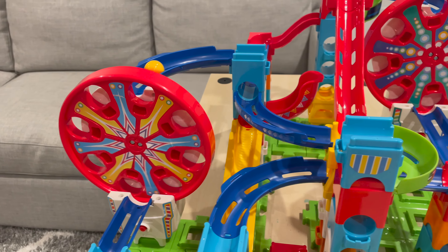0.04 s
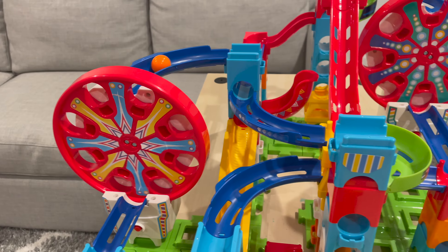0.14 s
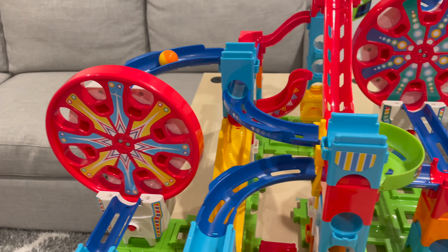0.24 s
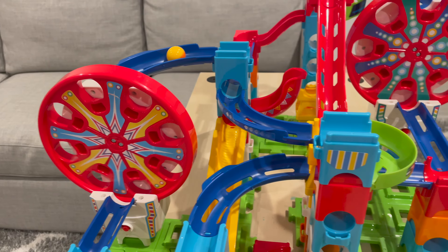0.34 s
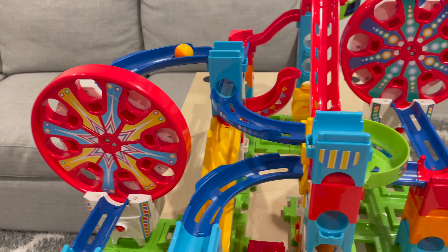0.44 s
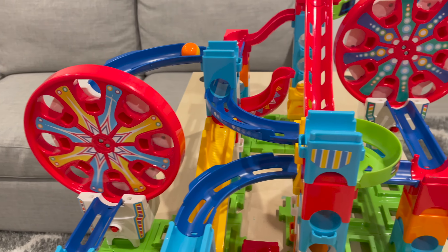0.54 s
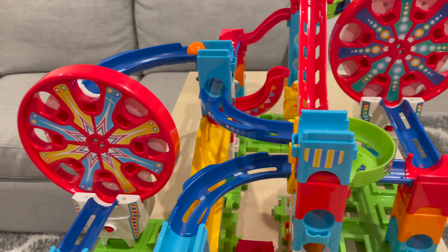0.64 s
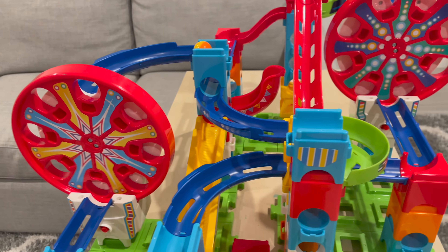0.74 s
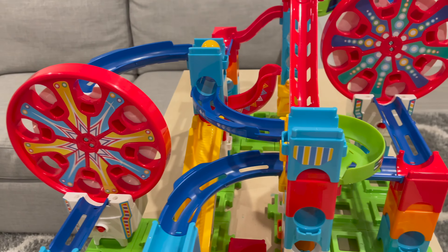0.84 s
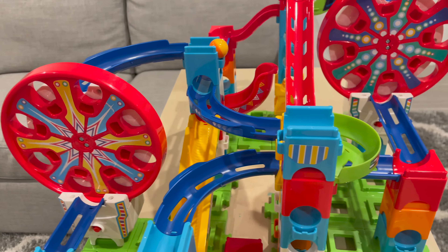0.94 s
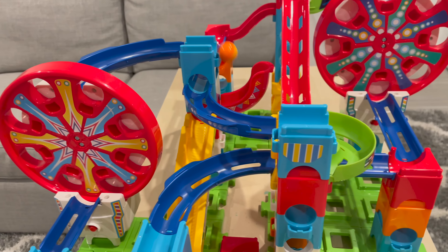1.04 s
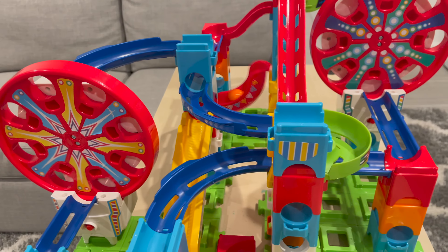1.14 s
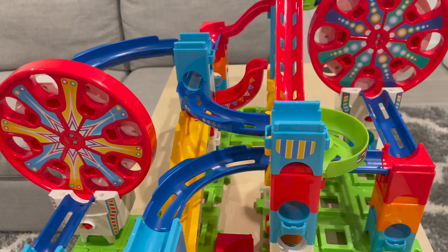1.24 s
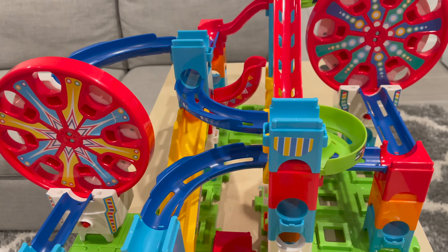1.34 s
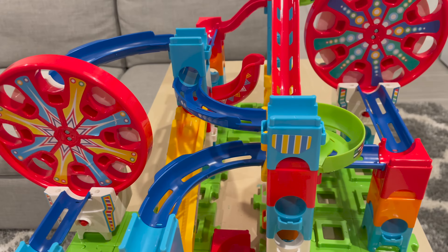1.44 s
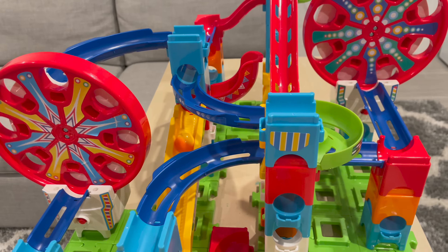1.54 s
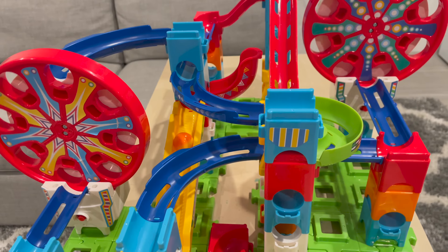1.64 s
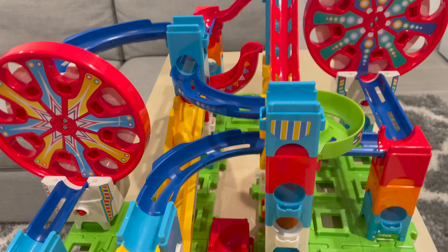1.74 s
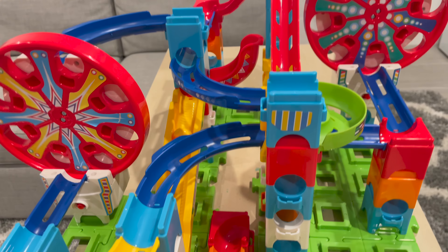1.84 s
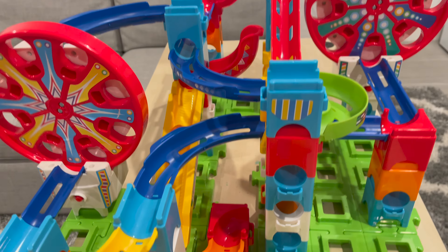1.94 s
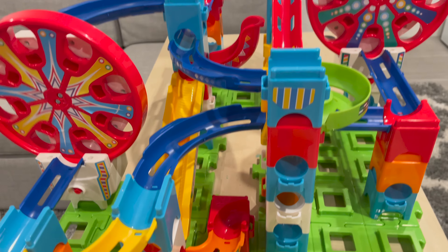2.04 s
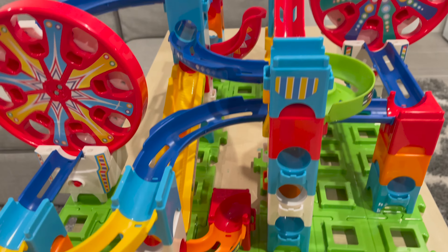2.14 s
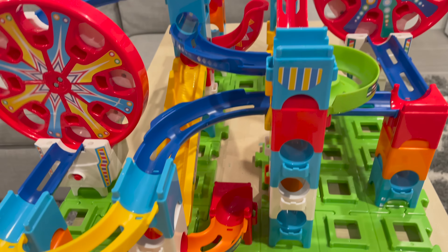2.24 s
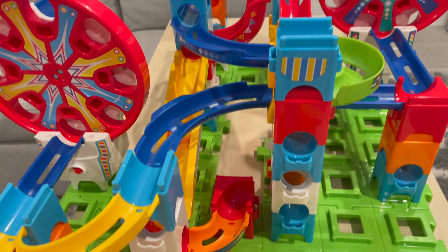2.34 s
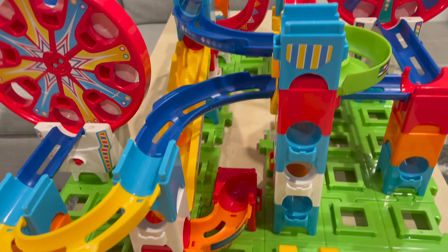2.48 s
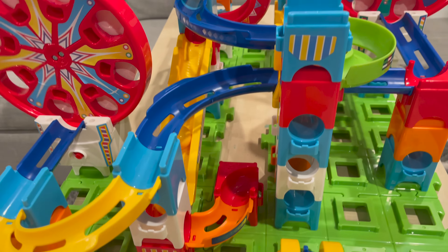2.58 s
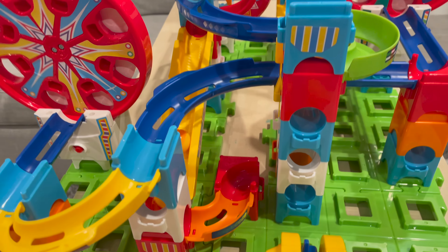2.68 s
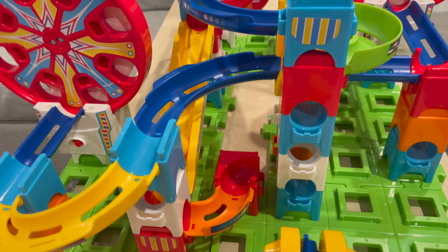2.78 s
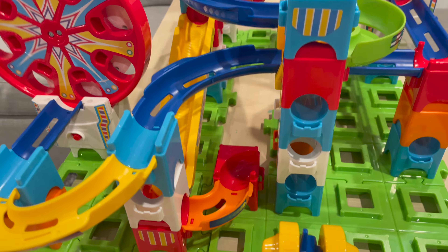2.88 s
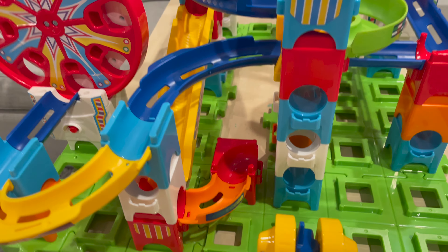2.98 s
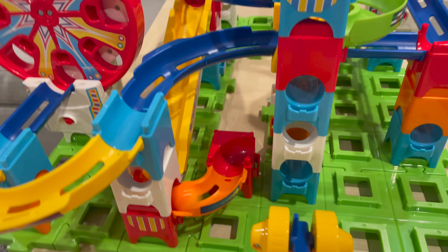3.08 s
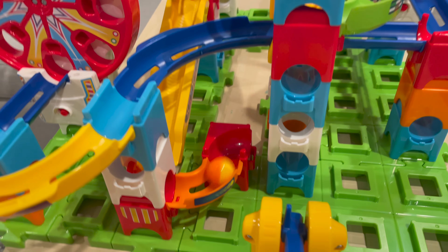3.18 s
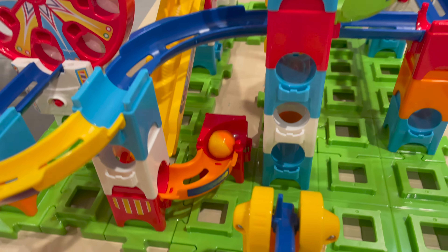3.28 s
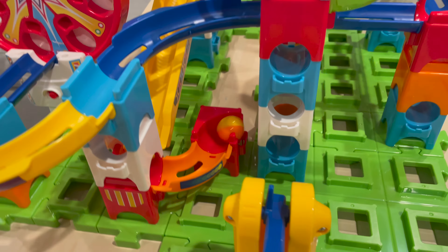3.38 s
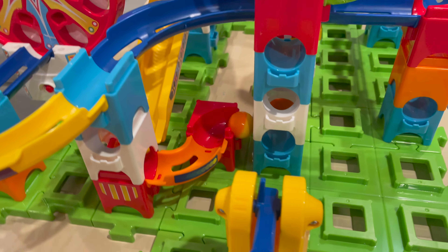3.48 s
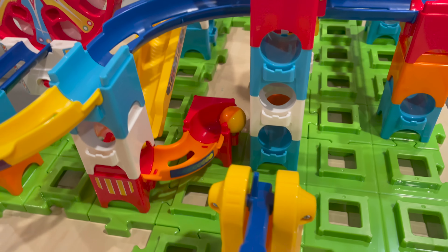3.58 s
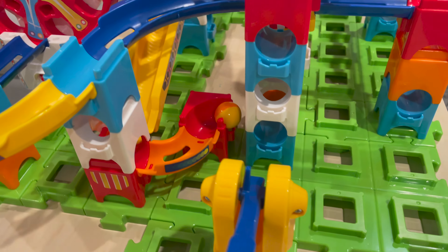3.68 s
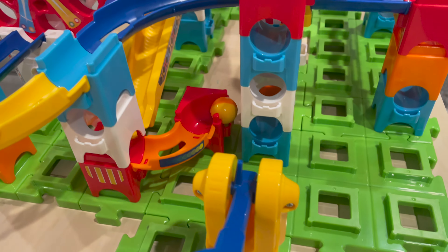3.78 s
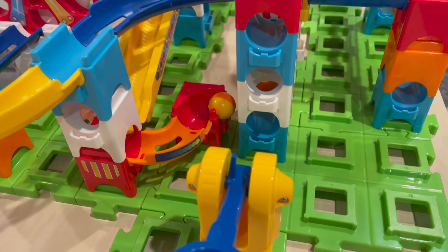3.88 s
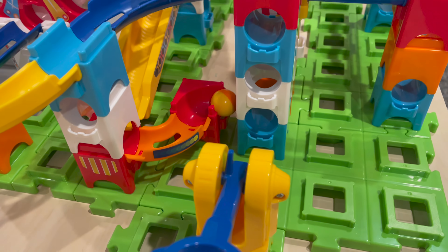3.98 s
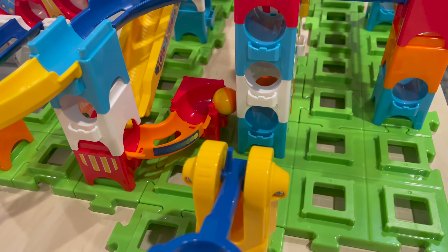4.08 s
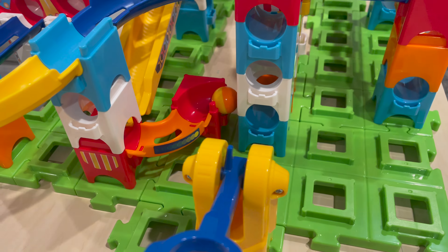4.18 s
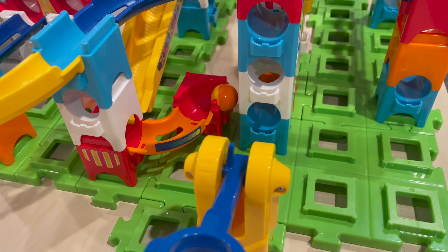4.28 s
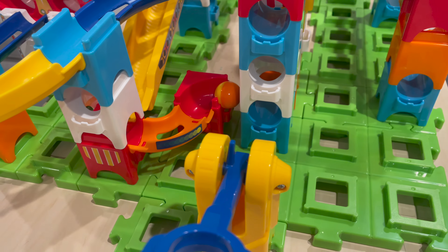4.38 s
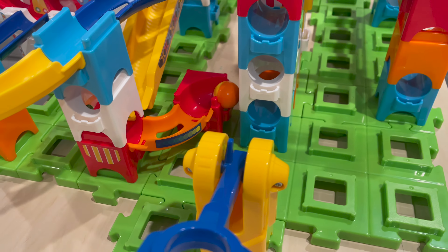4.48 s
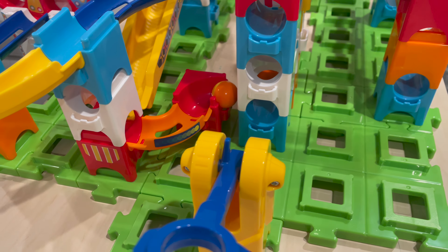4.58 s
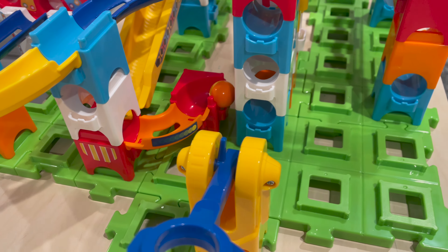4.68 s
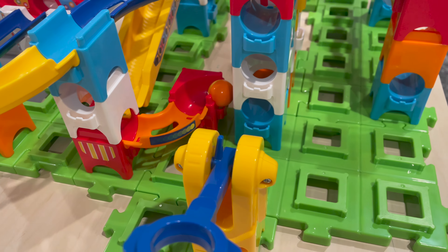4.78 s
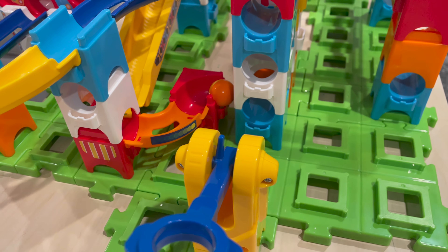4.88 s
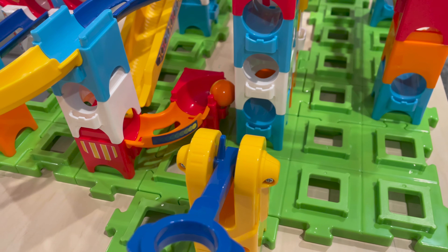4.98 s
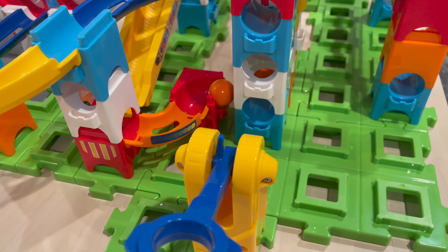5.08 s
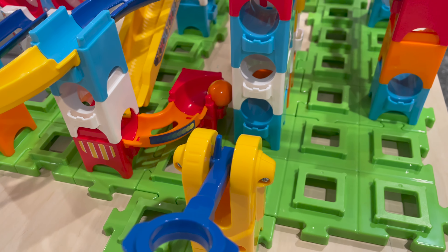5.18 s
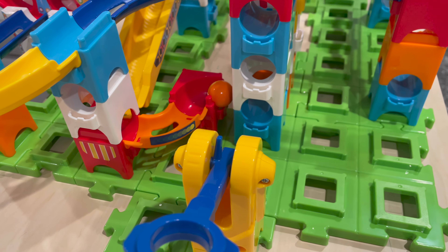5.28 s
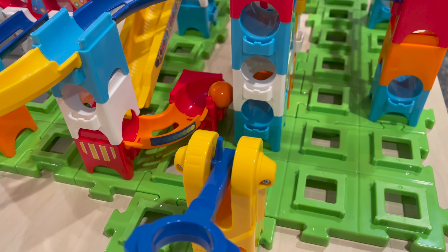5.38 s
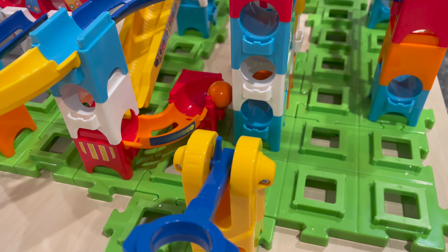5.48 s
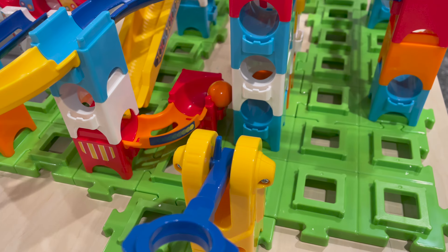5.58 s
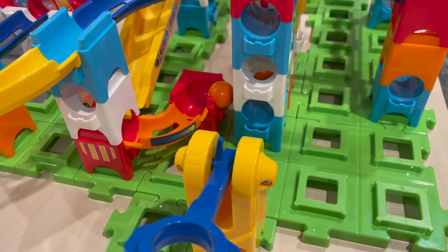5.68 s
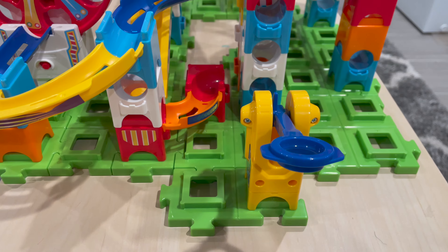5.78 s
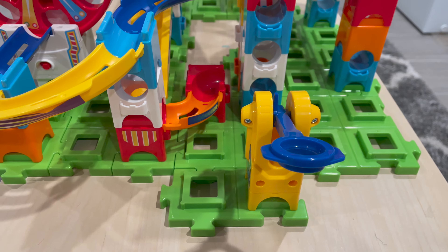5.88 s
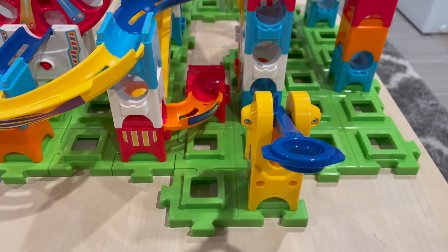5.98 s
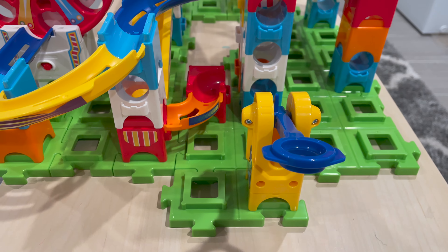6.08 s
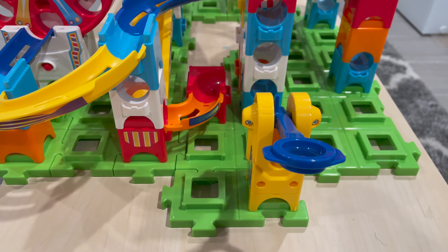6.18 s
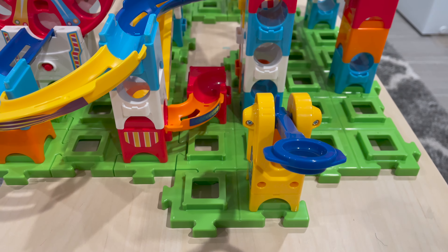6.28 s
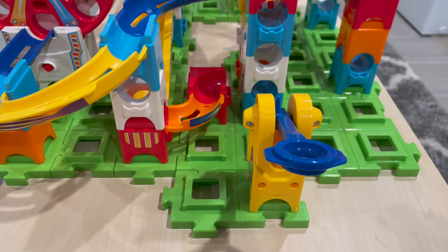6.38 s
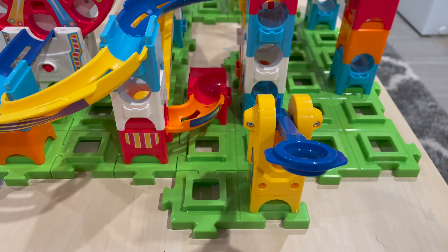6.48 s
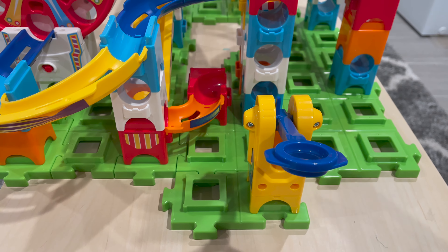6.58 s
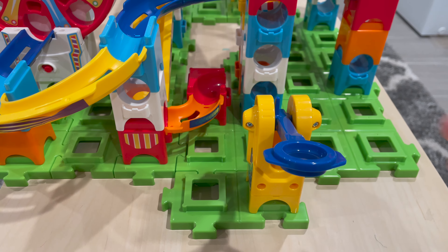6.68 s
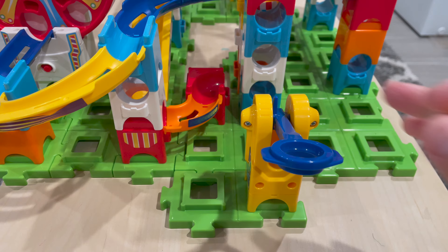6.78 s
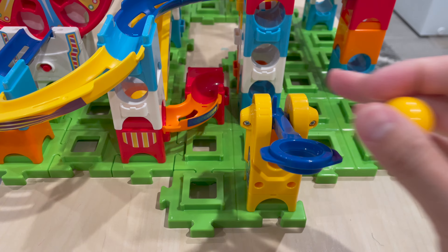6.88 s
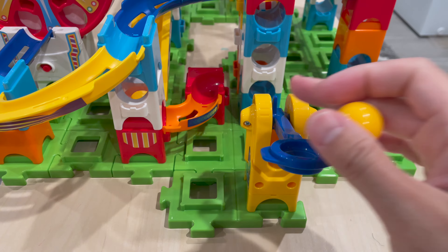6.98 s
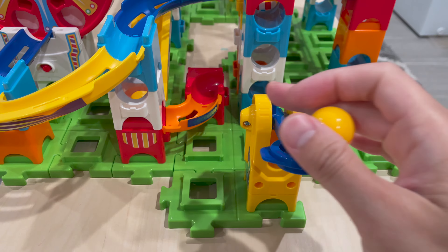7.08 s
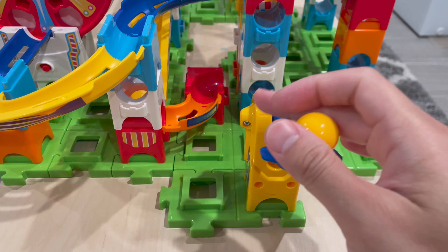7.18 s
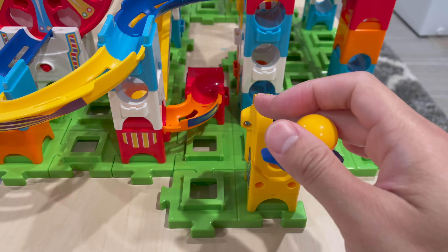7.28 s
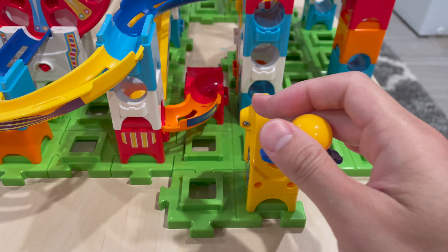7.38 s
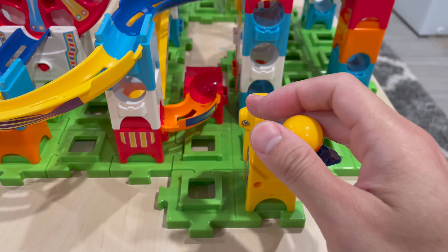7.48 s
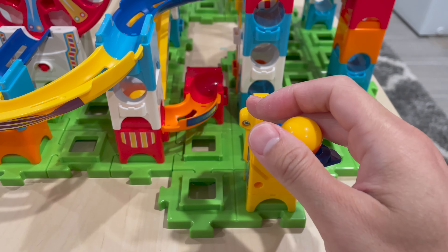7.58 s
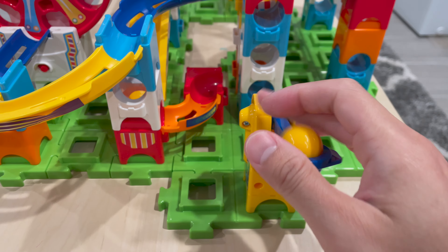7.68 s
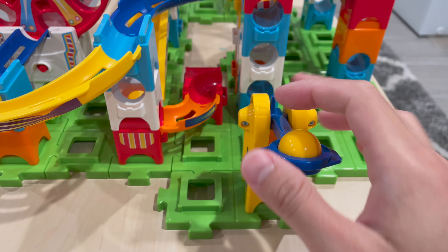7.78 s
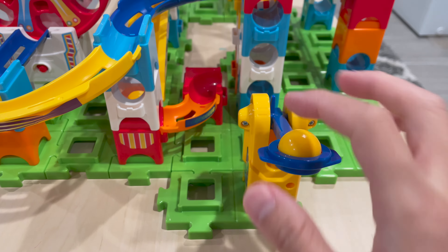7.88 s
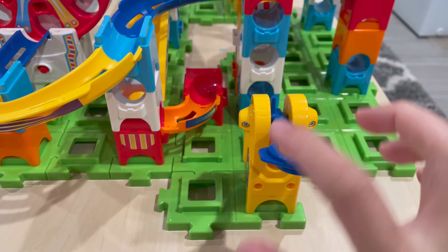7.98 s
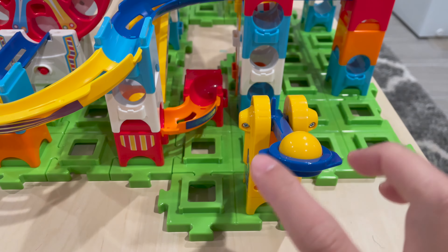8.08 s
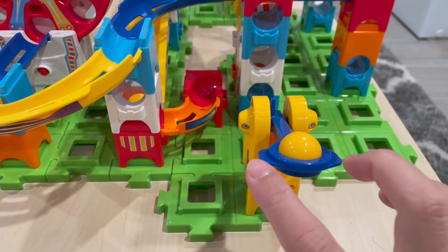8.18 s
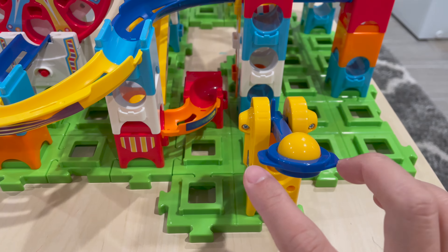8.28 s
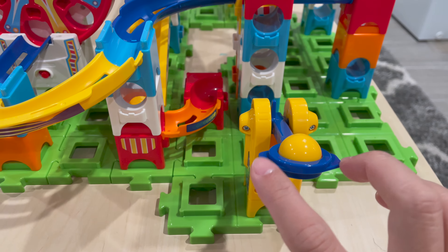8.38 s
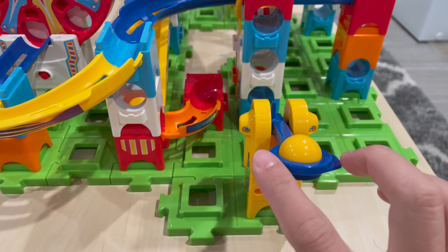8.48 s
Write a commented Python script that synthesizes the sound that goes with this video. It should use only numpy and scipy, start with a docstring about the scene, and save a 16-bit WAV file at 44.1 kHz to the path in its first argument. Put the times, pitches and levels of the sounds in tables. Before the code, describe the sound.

A small geared motor in a toy marble run hums and whirs throughout, close to the microphone, over the faint hiss of a quiet room. From the start, marbles tap lightly and roll along plastic track, with a sharper knock at about 0.7 seconds. From 1.1 to 1.5 seconds a marble drops through a hollow plastic tower and down a chute in a loud, fast clatter. After a lull, a second loud clatter comes at about 2.9 seconds, followed by rolling and more sharp knocks around 3.5 seconds. From 4 to 5.5 seconds a marble rocks and ticks softly until it settles. Near 5.8 seconds the whir changes tone slightly and continues alone, quieter. A plastic launcher clacks once at 7.2 seconds and gives a short rattling cluster of clacks around 7.7 seconds, leaving only the motor until about 8.5 seconds.

```python
"""A toy marble run on a table in a quiet room, close to a phone with two microphone ports.
A small geared motor hums and whirs throughout. Marbles tap over a bridge, then drop through a tower
(1.1 s) to a chute and ramp; impacts and rolling excite the damped modes of the hollow plastic.
A second drop (2.9 s) leads through a bend and a funnel, and a marble rocks in a corner (4-5.5 s).
The level dips briefly (5.8 s), the whir changes colour and the hiss weakens; a launcher clacks (7-8 s)."""
import sys
import numpy as np
from scipy import signal
from scipy.fft import rfft, irfft, next_fast_len
from scipy.io import wavfile
from scipy.ndimage import uniform_filter1d

SR = 44100
rng = np.random.default_rng(int(sys.argv[2]) if len(sys.argv) > 2 else 0)


def put_to_file(sound):
    """Save the sound as 16-bit audio at rate SR, in the file named by the first command-line argument."""
    columns = np.atleast_2d(sound).T  # one column per channel
    safe = np.clip(columns, -1, 1)
    whole_steps = np.round(safe * 32767)
    wavfile.write(sys.argv[1], SR, whole_steps.astype(np.int16))


N = 376173
TIME = np.arange(N) / SR
LN_1000 = np.log(1000)  # a decay of 60 dB, in nepers
DIP_S, DIP_HALF_S = 5.755, 0.012


def undb(db):
    """Level to amplitude ratio."""
    return 10 ** (np.asarray(db) / 20)


def unit(x):
    """Normalisation to rms 1."""
    return x / np.sqrt(np.mean(x ** 2))


def along(table, hz):
    """Interpolation on a logarithmic frequency axis."""
    f, values = np.transpose(table)
    return np.interp(np.log(hz + 1), np.log(f), values)


def curves(table):
    """Linear interpolation of each column in time."""
    times, *columns = np.transpose(table)
    return [np.interp(TIME, times, column) for column in columns]


def shape(x, gain):
    """Filtering as multiplication of the spectrum by gain(frequency)."""
    n = next_fast_len(x.shape[-1])
    return irfft(rfft(x, n) * gain(np.fft.rfftfreq(n, 1 / SR)), n)[..., :x.shape[-1]]


def ring(x, hz, t60):
    """Forced response of one damped mode."""
    pole = np.exp(2j * np.pi * hz / SR - LN_1000 / (t60 * SR))
    return signal.lfilter([1], [1, -pole], x).imag


def drift(rate_hz):
    """Slow random fluctuation with a standard deviation near 1."""
    steps = np.arange(int(N / SR * rate_hz) + 2) * SR / rate_hz
    return 1.2 * np.interp(np.arange(N), steps, rng.standard_normal(len(steps)))


# Interchannel phase: (frequency [Hz], left minus right [rad])
PHASE_DIFFERENCE = [(200, 0), (1300, .3), (2800, .9), (4600, .4), (5700, -1.3), (7600, -2.8), (9600, -3.5),
                    (11600, -5.7), (13000, -6.3), (17000, -6.4)]
# Interchannel level: (frequency [Hz], left minus right [dB])
LEVEL_DIFFERENCE = [(60, 3.5), (300, 3), (1500, 4), (3000, 4.5), (5000, 3.5), (9000, -0.5), (14000, 3.5)]
def stereo_image(x):
    """Interchannel level and phase differences; above about 12 kHz the sound is in phase, nearly mono."""
    half = lambda hz: undb(along(LEVEL_DIFFERENCE, hz) / 2) * np.exp(0.5j * along(PHASE_DIFFERENCE, hz))
    return np.array([shape(x[0], half), shape(x[1], lambda hz: 1 / half(hz))])


# Interchannel coherence: (frequency [Hz], shared power [fraction])
COHERENCE = [(60, 0.92), (300, 0.73), (900, 0.24), (1500, 0.099), (3000, 0.51), (6000, 0.77), (8500, 1),
             (15000, 0.98)]
def spread(make):
    """Partial coherence: left and right share part of a sound; the rest is independent in each."""
    both, left, right = make(), make(), make()
    share = lambda hz: np.clip(along(COHERENCE, hz), 0, 1)
    diffuse = shape(np.array([left, right]), lambda hz: np.sqrt(1 - share(hz)))
    return shape(both, lambda hz: np.sqrt(share(hz))) + diffuse


# Background noise: (frequency [Hz], relative spectrum level [dB])
ROOM_SPECTRUM = [(25, -34), (44, -4.5), (53, 5), (62, -2), (85, -3), (170, -10.5), (400, -10.5),
                 (900, -12.5), (1300, -21), (2800, -18.5), (5000, -19), (7000, -26), (9000, -23.5),
                 (13000, -28), (15700, -29.5), (16100, -79)]
def room(level_db=-46, hiss_from_hz=4800, late_hiss_db=-3.5):
    """Broadband noise of air, distant appliances and microphones; the hiss is weaker after the dip."""
    air = spread(lambda: unit(shape(rng.standard_normal(N), lambda hz: undb(along(ROOM_SPECTRUM, hz)))))
    hiss = shape(air, lambda hz: 1 / (1 + (hiss_from_hz / (hz + 1)) ** 4))
    hiss_db = np.where(TIME < DIP_S, 0, late_hiss_db)
    return undb(level_db + 0.5 * drift(1.55)) * (air - hiss + undb(hiss_db) * hiss)


# Motor running: (time [s], rotation rate [Hz], hum level [dB])
MOTOR_RUN = [(0, 96.26, -51), (1.8, 95.57, -49.5), (2.9, 95.85, -47), (4, 95.2, -49), (5.7, 96.66, -46.5),
             (5.78, 97.1, -48), (6.5, 96.2, -50), (7.9, 97.1, -50), (8.53, 95.6, -50.5)]
# Hum partials: (harmonic number, relative level [dB])
HUM_HARMONICS = [(1, 6.5), (2, 1), (3, -0.5), (4, 2), (5, -28), (6, -3), (7, -3.5), (8, -12), (9, 5.5),
                 (10, -53), (11, -4.5), (12, 0.5), (13, 2), (14, -8), (15, -2), (16, -17), (17, -2.5),
                 (18, -5), (19, -23), (20, -24), (21, -10), (22, -34), (23, 3), (24, 0), (25, -8)]
# Gear noise: (time [s], level [dB])
WHIR_LEVEL = [(0.0, -52), (1.02, -46.5), (1.19, -39), (1.71, -42.5), (1.99, -44.5), (2.4, -44),
              (3.06, -44.5), (3.42, -46), (3.82, -50), (4.08, -44), (4.23, -41), (5.06, -42.5), (5.56, -47),
              (5.87, -47), (7.01, -49.5), (8.03, -51), (8.53, -50)]
# Gear case: (frequency [Hz], bandwidth [Hz], relative level before the dip [dB], after it [dB])
CASE_MODES = [(1806, 180, 3.5, 5.5), (1996, 150, -17, 3), (2350, 73, -2, -5), (2980, 250, -4, 0.5),
              (3342, 110, -1.5, 4.5), (3532, 40, 1.5, 4), (3787, 59, -1, -13), (3946, 84, -8, 3.5),
              (4358, 54, -6, 1.5), (6060, 480, -8, -2)]
def motor(waver_db=3.0, throb_depth=0.38):
    """Rotation gives a harmonic series; tooth noise, modulated once a turn, drives the gear case modes."""
    turn_hz, hum_db = curves(MOTOR_RUN)
    whir_db, = curves(WHIR_LEVEL)
    angle = 2 * np.pi * np.cumsum(turn_hz) / SR

    def hum():
        return unit(sum(undb(db + waver_db * drift(5.5)) * np.sin(k * angle + 2 * np.pi * rng.random())
                        for k, db in HUM_HARMONICS))

    def whir():
        case = np.zeros(N)
        for hz, width, early_db, late_db in CASE_MODES:
            gain = undb(np.where(TIME < DIP_S, early_db, late_db) + 0.5 * drift(10))
            teeth = rng.standard_normal(N) * (1 + throb_depth * np.sin(angle))
            case += gain * unit(ring(teeth, hz, LN_1000 / (np.pi * width)))
        return unit(case)

    return undb(hum_db) * spread(hum) + undb(whir_db) * spread(whir)


def echoes(x, level_db=-14.5, t60=0.2, low_hz=148, high_hz=1480):
    """Reverberation: nearby pieces, table and walls return a duller, exponentially decaying tail."""
    t = TIME[:int(0.3 * SR)]
    tail = spread(lambda: rng.standard_normal(N))[:, :len(t)] * np.exp(-LN_1000 * t / t60) * (t > 0.002)
    tail = shape(tail, lambda hz: 1 / (1 + (hz / high_hz) ** 2) / (1 + (low_hz / (hz + 1)) ** 2))
    tail *= undb(level_db) / np.sqrt(np.sum(tail ** 2, axis=1, keepdims=True))
    return signal.fftconvolve(x, tail, axes=1)[:, :N]


# Pieces in turn: bridge, tower top, tower drop, chute, ramp, second drop, bend, skid, funnel, corner,
# launcher arm, launcher cup. Levels are relative.
# (start [s], thud frequency [Hz], shake [dB], contact time [s], mean track T60 [s], track [dB],
#  ragged push [dB], own modes in a knock [dB], own modes in a roll [dB], rattle [dB])
RUN_PIECES = [(0.0, 430, -9, 0.0023, 0.05, -6, -10, -11, -1, -31),
              (0.601, 507, -14, 0.0033, 0.04, -3, 2, -1, -3.5, -29),
              (1.1, 527, -12, 0.0022, 0.03, -4, -2.5, -4, 3.5, -27),
              (1.29, 362, -15, 0.0023, 0.03, -5.5, -3.5, -5, 9, -28),
              (1.39, 540, -11, 0.0028, 0.037, -11, -4, -8, 4, -28),
              (2.601, 488, -12, 0.002, 0.023, -2, -6, -1.5, 1.5, -34),
              (3.025, 375, -14, 0.002, 0.012, -5, -3, -9, 2, -33),
              (3.1, 357, -7.5, 0.0046, 0.015, -1, -1, -10, -1.5, -31),
              (3.4, 520, -16, 0.0028, 0.03, -5.5, -3, -7, -1, -18.5),
              (3.9, 515, -25, 0.0019, 0.029, -8, -17, -4, 2.5, -26),
              (7.0, 513, -15, 0.0024, 0.021, -10, -8, 4, -0.5, -26),
              (7.5, 520, -10, 0.0021, 0.02, -5.5, 1, -3, 3.5, -20)]
# Own modes, one list a piece: (frequency [Hz], bandwidth before widening [Hz], relative level [dB])
PIECE_MODES = [
    [(442, 63, 1.5), (796, 55, 4.5), (1200, 29, 2.5), (1594, 77, 4), (2030, 140, -4)],
    [(1330, 130, 3.5), (1530, 28, -22), (1810, 24, -7), (2036, 35, -2.5)],
    [(600, 23, -13), (743, 71, -12.5), (2030, 100, 1), (2440, 50, -6), (2920, 32, -10.5), (3600, 60, -17)],
    [(1320, 160, -4), (2040, 98, 4), (2560, 36, 0.5), (3340, 33, -14.5), (4100, 240, -14), (4600, 83, -9)],
    [(583, 28, -4), (791, 47, -11), (1290, 65, -5), (1470, 23, -5), (2080, 140, -1)],
    [(312, 55, 2), (533, 66, -4.5), (800, 120, -7), (1084, 24, 0), (1310, 120, 2), (2080, 21, -1)],
    [(904, 30, -7.5), (1690, 53, 6), (2020, 19, 2), (2120, 17, 0), (2620, 24, 0), (5110, 140, -19)],
    [(1077, 66, 1), (1340, 65, -1), (1620, 120, 2), (2170, 69, -2), (3400, 88, -7.5), (4100, 38, -17)],
    [(1090, 95, 1), (1350, 110, 1), (1730, 83, -2), (2170, 78, -5), (3170, 210, -18), (3860, 150, -7.5),
     (4500, 100, -13), (5160, 130, -15)],
    [(374, 46, -0.5), (601.5, 40, -0.5), (784, 126, 4), (1070, 73, 2.5), (1365, 24, 0.5), (2303, 15, -8)],
    [(487, 150, 0), (1784, 31, 1), (2370, 66, -12), (2580, 27, -10), (3320, 60, -12), (3960, 31, -6)],
    [(590, 150, 3), (1000, 56, -1), (1470, 47, -7), (1608, 22, -10), (2100, 60, -9), (2265, 25, -12),
     (2800, 62, -11), (3530, 68, -2)],
]
def piece_resonance(taps, widen=1.35):
    """Local resonance: taps excite the modes of whichever piece the marble is in."""
    out = np.zeros(N)
    edges = [int(row[0] * SR) for row in RUN_PIECES] + [N]
    for a, b, (*_, roll_db, _), modes in zip(edges, edges[1:], RUN_PIECES, PIECE_MODES):
        sound = sum(undb(db) * unit(ring(taps[a:b], hz, LN_1000 / (np.pi * widen * width)))
                    for hz, width, db in modes)
        out[a:b] = undb(roll_db) * unit(sound)
    return out


def piece_at(time_s):
    """Settings and modes of the piece in play at this time."""
    k = sum(row[0] <= time_s for row in RUN_PIECES) - 1
    return RUN_PIECES[k][1:], PIECE_MODES[k]


def rattle(decay_s=0.0091):
    """Exponential decay: the envelope of the rattle that each knock leaves."""
    jolts = np.zeros(N)
    for start, level_db, *_ in IMPACTS:
        (*_, rattle_db), _ = piece_at(start)
        jolts[int(start * SR)] = undb(level_db + rattle_db)
    return uniform_filter1d(signal.lfilter([1], [1, -np.exp(-1 / (decay_s * SR))], jolts), size=100)


# Plastic track, rolled on or struck: (frequency [Hz], relative level [dB], T60 before scaling [s])
TRACK_MODES = [(224, -7, 0.034), (332, -45, 0.26), (408, 1.5, 0.21), (531, -18, 0.15), (634, -1.5, 0.075),
               (774, -1, 0.057), (986, 4.5, 0.027), (1055, 1, 0.073), (1204, -0.5, 0.038),
               (1300, 3.5, 0.099), (1525, -1, 0.035), (1603, -1.5, 0.071), (1747, -3.5, 0.099),
               (2100, -1.5, 0.063), (2258, -11.5, 0.27), (2390, -12, 0.12), (2557, -3.5, 0.093),
               (2630, -3, 0.084), (3550, 3.5, 0.0049), (4150, -5.5, 0.066), (4800, -7, 0.011),
               (5550, 0.5, 0.0037), (6830, 5.5, 0.0066)]
# Rolling and rubbing: (start [s], end [s], start level [dB], end level [dB], tilt [dB/octave])
ROLLS = [(0.021, 0.409, -46.5, -42.5, -2.5), (0.422, 0.65, -46.5, -40.5, 0), (0.728, 1.04, -40, -46.5, -1),
         (1.187, 1.395, -41, -44, 4), (1.413, 1.52, -37.5, -33, 2.5), (1.513, 1.588, -37, -51, 1.5),
         (2.583, 2.952, -58.5, -52.5, 4.5), (2.946, 3.03, -30, -25.5, -2), (3.037, 3.113, -27, -36.5, 0),
         (3.116, 3.142, -24, -33, 3), (3.161, 3.477, -35, -44, -2.5), (3.518, 3.698, -38, -55, -1.5),
         (3.713, 3.915, -46.5, -53, 1), (3.965, 4.22, -44, -58.5, -7), (4.22, 4.337, -45, -58, -8),
         (4.327, 4.58, -50, -43.5, -4), (4.602, 5.152, -47, -47.5, 1), (5.16, 5.75, -47, -51.5, -3),
         (7.07, 7.172, -50.5, -43, -5), (7.655, 7.798, -50, -54, -4)]
def rolling(taps_per_s=2516, scatter_db=2, uneven_db=1.47, walls_db=-1.5, base_db=13, track_db=-5):
    """Roughness excitation: seams and dust under the marble tap the track at random."""
    roll, tilt = np.zeros(N), np.full(N, -12.0)  # between rolls the rattle is dull
    for start, end, start_db, end_db, slope in ROLLS:
        on = (TIME >= start) & (TIME < end)
        roll[on] = undb(np.interp(TIME[on], [start, end], [start_db, end_db]))
        tilt[on] = slope
    envelope = uniform_filter1d(roll * undb(uneven_db * drift(15)), size=600) + rattle()
    tilt = uniform_filter1d(tilt, size=600)
    taps = (rng.random(N) < taps_per_s / SR) * rng.standard_normal(N)
    taps *= undb(scatter_db * np.minimum(rng.exponential(size=N), 4.5))
    body = np.zeros(N)
    for hz, db, t60 in TRACK_MODES:
        # gentle contact excites the base more, and the thin walls less, than a blow
        gentle_db = walls_db * (hz > 2550) + base_db * (hz < 270)
        gain = undb(db + gentle_db + tilt * np.log2(hz / 800) + 2 * drift(20))
        body += gain * unit(ring(ring(taps, hz, 0.36 * t60), hz, 0.12 * t60))
    return envelope * (body / np.sqrt(len(TRACK_MODES)) * undb(track_db) + piece_resonance(taps))


def plastic_response(t, main_hz, mean_t60, modes, own_db, reach_octaves=1.33, widen=1.45, shake_s=0.037):
    """Modal superposition: the ring of track and piece, and the shaking of loose joints after a blow."""
    hz, db, t60 = np.transpose(TRACK_MODES)[:, :, None]
    scatter, detune = rng.standard_normal((2, len(hz), 1))
    gain = undb(db + 4 * scatter - 6.4 * (np.log2(hz / main_hz) / reach_octaves) ** 2)
    phase = 2 * np.pi * hz * (1 + 0.031 * detune) * t + 3 * detune
    decay = LN_1000 / mean_t60
    track = np.sum(gain * np.sin(phase) * np.exp(-decay * t * t60.mean() / t60), axis=0)
    shaking = rng.standard_normal(len(t)) * (1 - np.exp(-t / 0.005)) * np.exp(-t / shake_s)
    damped = track * np.exp(-7.3 * decay * t)  # loose joints add damping
    shake = signal.fftconvolve(damped, shaking)[:len(t)]
    own_hz, width, mode_db = np.transpose(modes)[:, :, None]
    own_gain = gain.max() * undb(own_db + mode_db + 3.5 * scatter[:len(modes)])
    own = own_gain * np.sin(2 * np.pi * own_hz * t) * np.exp(-np.pi * widen * width * t)
    return track + own.sum(axis=0), shake


def thud(t, hz):
    """Low resonance: a soft noise pulse drives three heavily damped modes of the hollow tower."""
    pulse = rng.standard_normal(len(t)) * t * np.exp(-t / 0.0018)
    return sum(ring(ring(pulse, k * hz, 0.017), k * hz, 0.024) * k ** 0.49 for k in (0.4, 0.62, 1))


# Contact noise, clack and brighter crack: (frequency [Hz], relative spectrum level [dB])
CLACK_SPECTRUM = [(2000, -38), (3000, 2.5), (3500, 10.5), (4200, 4.5), (5000, 3.5), (6500, -2),
                  (8000, -7.5)]
CRACK_SPECTRUM = [(4000, -71), (6500, 13.5), (8500, 23.5), (11000, 13), (14500, 8), (16000, -6),
                  (17000, -46)]
def contact_noise(t, push, crack_s=0.017):
    """A brief contact has a broad spectrum: clack and crack lead each knock."""
    clack = shape(rng.standard_normal(len(t)), lambda hz: undb(along(CLACK_SPECTRUM, hz)))
    crack = shape(rng.standard_normal(len(t)), lambda hz: undb(along(CRACK_SPECTRUM, hz)))
    return clack * push, crack * push * np.exp(-t / crack_s)


# Marble impacts: (time [s], reference level [dB], low ring [Hz], low ring [dB], high ring [Hz],
#  high ring [dB], ring T60 [s], clack [dB], crack [dB], thud [dB], left minus right [dB])
IMPACTS = [(0.064, -31, 1000, -43, 1560, -43, 0.037, -54, -59, -49, 6),
           (0.131, -27, 1195, -37, 1630, -34, 0.036, -52, -57, -49, 6),
           (0.296, -28, 1080, -40, 1570, -49, 0.027, -54, -60, -53, 3.5),
           (0.348, -29, 1010, -39, 1650, -40, 0.03, -51, -61, -45, 8),
           (0.518, -32, 785, -39, 1540, -42, 0.032, -46, -61, -43, 4),
           (0.658, -21, 1370, -31, 1520, -39, 0.035, -45, -48, -45, 5.5),
           (0.697, -12.5, 1320, -24.5, 2025, -25.5, 0.048, -45, -46, -49, 3.5),
           (0.738, -28, 1180, -34.5, 2070, -40, 0.03, -52, -64, -53, 1),
           (1.044, -29, 1265, -31.5, 1500, -52, 0.022, -53, -55, -43.5, 5.5),
           (1.147, -11, 1214, -23, 1856, -20, 0.03, -29, -22, -42, 6),
           (1.151, -8, 1086, -23.5, 1797, -19, 0.032, -17.5, -20, -40, 4.0),
           (1.161, -17, 589, -28, 2040, -22, 0.03, -33, -39, -40, 3.5),
           (1.176, -17, 737, -24, 1840, -31, 0.03, -42, -48, -37, 5),
           (1.198, -22, 580, -25.5, 1780, -28, 0.027, -35, -34, -43, 5.5),
           (1.218, -15, 1140, -21, 1550, -27, 0.021, -33, -28, -34, 3.5),
           (1.234, -15, 1330, -26, 2160, -25.5, 0.033, -34, -32, -42, 9),
           (1.252, -17, 870, -27, 1960, -29, 0.034, -34, -29, -28, 4),
           (1.269, -22, 820, -24, 1590, -18.5, 0.027, -30, -21, -38, 3),
           (1.298, -15, 1290, -22, 2380, -17, 0.027, -25, -20, -38, 2.5),
           (1.307, -19, 1400, -44, 2030, -21, 0.03, -30, -27, -37, 6),
           (1.33, -12.5, 1280, -26, 2520, -22.5, 0.03, -22, -33, -45, 7),
           (1.343, -13, 1400, -30, 2040, -24, 0.03, -30, -34, -47, 1),
           (1.356, -14, 802, -30, 1960, -26.5, 0.036, -32, -36, -43, 2.5),
           (1.4, -25, 1010, -28, 2080, -36, 0.03, -38, -42, -41, 1),
           (1.421, -22, 1280, -28, 2050, -30, 0.03, -36, -45, -42, 8),
           (1.437, -20, 980, -27, 2060, -31, 0.027, -39, -38, -39, 0),
           (1.458, -19, 1240, -27, 2000, -37, 0.035, -40, -44, -39, 8),
           (1.484, -18, 1250, -24.5, 1500, -38, 0.03, -40, -39, -40, 7),
           (1.493, -18, 797, -24.5, 1630, -29, 0.035, -30, -32, -33, 2),
           (2.711, -31, 970, -34, 1800, -46, 0.04, -48, -57, -38, 2),
           (2.946, -11, 830, -22, 1550, -36, 0.03, -33, -36, -32, 7),
           (2.957, -15, 1186, -24.5, 2080, -32, 0.032, -49, -51, -34, 0),
           (2.985, -17, 1280, -26.5, 2050, -30, 0.03, -40, -42, -33, 8),
           (3.006, -10, 840, -23.5, 1980, -30, 0.033, -33, -39, -29, 3.5),
           (3.013, -10, 610, -30, 2050, -21, 0.037, -25.5, -25, -29, 7),
           (3.032, -7, 786, -26, 2080, -12, 0.025, -25, -17, -37, 3.5),
           (3.046, -4, 886, -29, 1720, -21.5, 0.03, -27, -27, -40, 8),
           (3.061, -16, 1050, -30, 1710, -22, 0.03, -32, -26, -38, 3),
           (3.074, -17, 934, -34, 1940, -24, 0.03, -40, -40, -27, 3.0),
           (3.085, -21, 1080, -32, 1870, -31, 0.034, -38, -47, -40, 2),
           (3.125, -17, 1240, -31, 1770, -27, 0.03, -35, -34, -38, 1),
           (3.131, -18, 1080, -34, 2150, -27.5, 0.03, -27, -35, -42, 5),
           (3.196, -24, 1070, -42, 1620, -36, 0.03, -42, -49, -42, 4),
           (3.238, -21, 980, -36, 1640, -33.5, 0.03, -36, -41, -40, 5),
           (3.258, -24, 1190, -35, 1680, -32, 0.026, -45, -49, -44, 6),
           (3.372, -34, 1060, -42, 1600, -53, 0.03, -48, -62, -45, 3.5),
           (3.468, -15, 1380, -26, 1490, -29, 0.026, -35, -35, -43, 5),
           (3.474, -11.5, 1440, -22, 1640, -21.5, 0.022, -20, -28, -35, 4),
           (3.493, -10.5, 1090, -24, 2150, -15, 0.036, -28, -20, -37, -0.5),
           (3.528, -28, 1050, -38, 2210, -38, 0.03, -44, -53, -45, 1.0),
           (3.974, -29, 1060, -37, 1610, -38, 0.032, -53, -60, -39.5, 6),
           (4.228, -27, 1080, -37, 1680, -40.5, 0.041, -42.5, -64, -43, 4),
           (4.34, -20, 1350, -37.5, 1550, -38, 0.033, -43, -60, -47, 3),
           (4.386, -27, 746, -39, 2300, -48, 0.03, -43.5, -62, -47, 2),
           (4.484, -26, 1060, -30, 1770, -36, 0.03, -47, -58, -44, 4.0),
           (4.52, -22, 1346, -33, 1530, -31.5, 0.03, -40.5, -60, -44, 3),
           (4.559, -32, 600, -39, 1730, -42, 0.035, -45, -63, -52, 4.5),
           (4.599, -28, 770, -40, 1550, -43, 0.03, -45.5, -58, -54, 3.5),
           (4.665, -24, 770, -39.5, 1550, -39, 0.033, -42, -63, -48, 4.0),
           (4.712, -34, 770, -42, 1550, -45, 0.036, -45.5, -60, -46, 5.0),
           (4.801, -40, 759, -40, 1550, -45, 0.03, -45, -61, -52, 3.5),
           (4.838, -27, 1370, -37.5, 1570, -41, 0.037, -49, -60, -46, 5.0),
           (4.923, -38, 1350, -48, 1740, -52, 0.03, -45, -55, -46, 3.5),
           (4.97, -27, 775, -43, 1720, -41, 0.03, -47, -60.5, -48, 4),
           (5.008, -40, 840, -40, 1740, -42, 0.03, -47, -58, -47, 3),
           (5.074, -33, 1080, -39.5, 1730, -49, 0.03, -48, -59, -47, 3),
           (5.11, -37, 760, -40, 1560, -43, 0.036, -48, -61.5, -55, 2),
           (5.14, -32, 1070, -37, 1750, -39, 0.033, -46, -58, -49, 4),
           (5.247, -34, 775, -45, 1660, -45, 0.03, -48, -60, -47, 3.5),
           (5.276, -33, 870, -40, 1680, -41, 0.035, -46, -58, -46, 4.0),
           (5.441, -38, 1070, -40.5, 1560, -51, 0.026, -52, -60, -44, 4),
           (7.215, -13.5, 592, -34, 2430, -26.5, 0.03, -35, -42, -37, 2.5),
           (7.658, -28, 1400, -37, 2300, -36, 0.03, -36, -59, -45, 6),
           (7.662, -25, 1360, -41, 2370, -38, 0.03, -44, -59, -42, 3),
           (7.692, -19, 552, -27.5, 2340, -31, 0.03, -40, -36, -32, 2),
           (7.7, -14, 1447, -25.5, 1466, -32, 0.059, -26, -23, -32, 4.5),
           (7.717, -13, 960, -26, 2160, -27.5, 0.026, -22.5, -18.5, -30, 5),
           (7.729, -23, 580, -27.5, 1920, -38, 0.022, -40, -43, -33, 5),
           (7.743, -26, 950, -41, 1820, -36, 0.03, -38, -40, -37, 4),
           (7.753, -26, 1050, -36, 2350, -35, 0.026, -44, -48, -36, 5)]
def knocks(rise_s=0.00036, onset_s=0.007, image_bias_db=4):
    """Impact excitation: a tap and a ragged push are convolved with the plastic's impulse response."""
    t = TIME[:4096]
    out = np.zeros((2, N + len(t)))
    unit_peak = lambda x: x / np.abs(x).max()
    unit_onset = lambda x: x / np.sqrt(np.mean(x[t < onset_s] ** 2))
    for (start, level_db, low_hz, low_db, high_hz, high_db, t60,
         clack_db, crack_db, thud_db, pan_db) in IMPACTS:
        (thud_hz, shake_db, contact_s, track_t60, track_db, ragged_db, own_db, *_), modes = piece_at(start)
        push = (1.3 - np.exp(-t / 0.002)) * np.exp(-t / contact_s)
        force = undb(ragged_db) * rng.standard_normal(len(t)) * push
        force[20] += np.sqrt(np.sum(push ** 2))  # the clean tap
        struck = lambda x: signal.fftconvolve(x * (1 - np.exp(-t / rise_s)), force)[:len(t)]
        main_hz = low_hz if low_db > high_db else high_hz  # modes near the stronger ring answer most
        body, shake = plastic_response(t, main_hz, track_t60, modes, own_db)
        low, high = (struck(np.sin(2 * np.pi * hz * t) * np.exp(-LN_1000 * t / t60))
                     for hz in (low_hz, high_hz))
        clack, crack = contact_noise(t, push)
        parts = ((low_db, low), (high_db, high), (clack_db, clack), (crack_db, crack),
                 (thud_db, thud(t, thud_hz)))
        hit = sum(undb(db) * unit_onset(part) for db, part in parts)
        hit += undb(level_db + track_db) * unit_peak(struck(body))
        hit += undb(level_db + shake_db) * unit_peak(shake)
        pan = undb(np.array([[1], [-1]]) * (pan_db - image_bias_db) / 2)
        i = int(start * SR)
        out[:, i:i + len(t)] += hit * pan
    return out[:, :N]


def scene():
    """Superposition of room, motor, marbles and their echoes in two channels."""
    # small pieces radiate no deep bass
    marbles = shape(knocks() + rolling(), lambda hz: 1 / (1 + (95 / (hz + 1)) ** 4))
    return stereo_image(room() + motor() + echoes(marbles) + marbles)


def record(dry, knee_db=-41.5, ratio=1.376, smoothing_s=0.22, low_hz=45, top_hz=16900):
    """Compression and band limiting: gain control ducks after loud knocks; the level dips once, briefly."""
    pole = np.exp(-1 / (smoothing_s * SR))
    envelope = np.sqrt(signal.lfilter([1 - pole], [1, -pole], np.mean(dry ** 2, axis=0)))
    gain = (1 + envelope / undb(knee_db)) ** (1 / ratio - 1)
    dip = np.clip(np.abs(TIME - DIP_S) / DIP_HALF_S, 0, 1)
    bass_cut = shape(dry, lambda hz: np.minimum(hz / low_hz, 1) ** 3)
    lowpass = signal.ellip(12, 0.2, 80, top_hz, fs=SR, output="sos")
    return signal.sosfilt(lowpass, bass_cut * gain * dip)


dry = scene()
out = record(dry)
put_to_file(out)
```